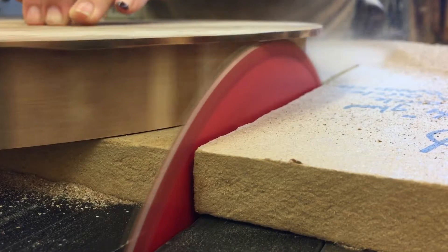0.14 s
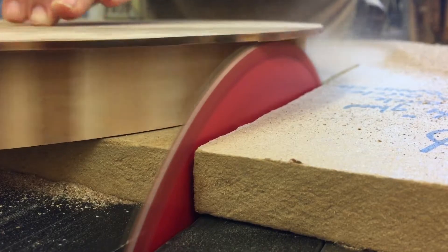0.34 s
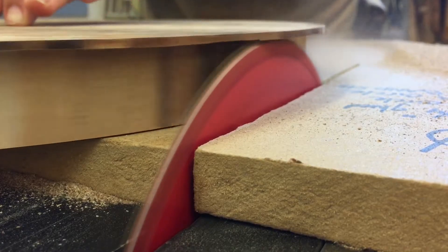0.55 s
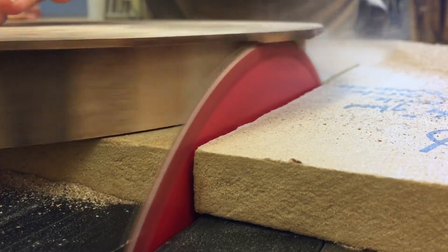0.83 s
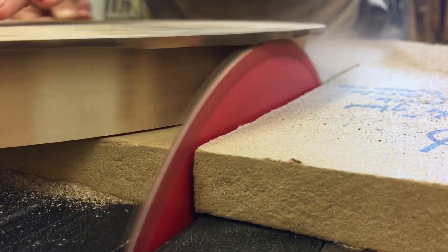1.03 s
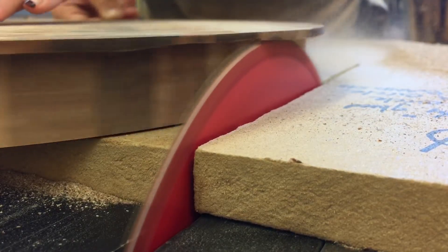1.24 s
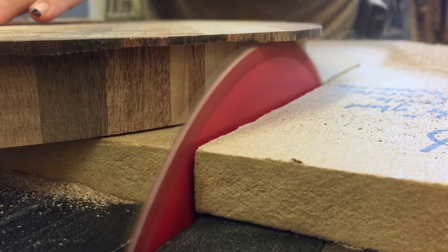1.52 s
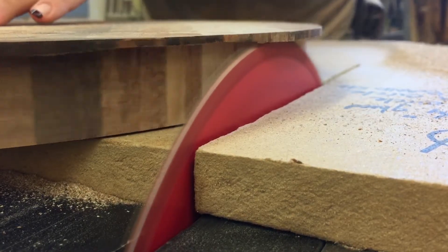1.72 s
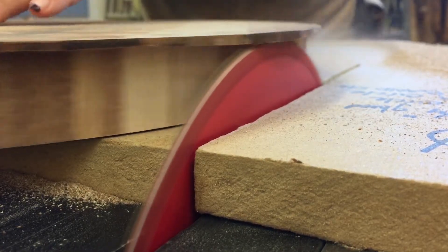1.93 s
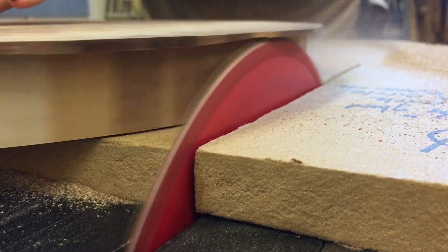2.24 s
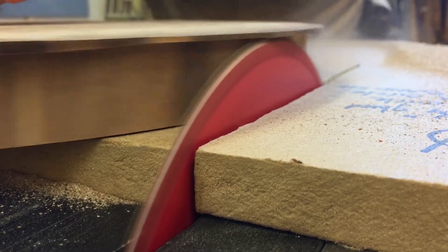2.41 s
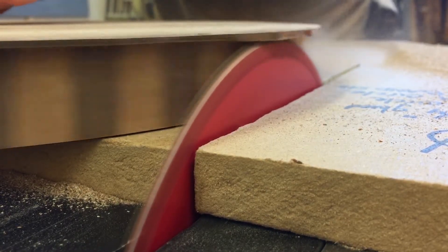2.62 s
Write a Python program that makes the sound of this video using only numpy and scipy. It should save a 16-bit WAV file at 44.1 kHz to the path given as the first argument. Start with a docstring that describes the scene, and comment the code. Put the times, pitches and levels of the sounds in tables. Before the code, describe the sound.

Close by, a table saw blade cuts continuously into a wooden edge, rasping and hissing over a low motor hum. A high whine and piercing squeals come and go, with a thin metallic shriek near the end.

```python
"""A table saw's teeth strike a turning round of glued wooden strips, trimming its edge, heard close by.
The periodic impacts make a whine whose harmonics swell into squeals; the unevenness of the teeth
repeats every turn as a buzz under the rasp and hiss of the chips. Resonances slide downwards as the
wood moves past the blade, the steel plate rings in its modes, and the motor hums below."""
import sys
import numpy as np
from scipy import signal
from scipy.fft import rfft, irfft
from scipy.io import wavfile

SR = 44100
rng = np.random.default_rng(int(sys.argv[2]) if len(sys.argv) > 2 else 0)


def transcribe(signal):
    """Save signal, clipped to [-1, 1], as a 16-bit WAV file at the path in sys.argv[1]."""
    frames = np.atleast_2d(signal).T
    limited = np.clip(frames, -1, 1)
    pcm = np.round(limited * 32767).astype(np.int16)
    wavfile.write(sys.argv[1], SR, pcm)


N = 122157
TIME = np.arange(N) / SR
FREQS = np.maximum(np.fft.rfftfreq(N, 1 / SR), 1)
TURNS_PER_S, TEETH = 68.52, 30
BITE_AT = 0.66   # share of a turn at which the blade bites hardest
LOW_CUT_HZ, HIGH_CUT_HZ = 53, 15780


# Envelopes of the tooth rate, its octave (the squeal) and its twelfth: t/s, relative level/dB
WHINE = [(0.0, -31), (0.05, -32), (0.15, -50), (0.2, -26), (0.47, -16), (0.52, -28), (0.87, -24.5),
         (1.03, -13.5), (1.13, -24), (1.72, -50), (1.95, -17.5), (2.07, -19), (2.23, -42), (2.27, -35),
         (2.77, -52)]
SQUEAL = [(0.0, -28), (0.09, -24), (0.14, -17), (0.21, -31), (0.25, -21), (0.43, -38), (0.51, -40),
          (0.6, -21), (0.67, -18.5), (0.76, -33), (0.8, -27), (0.91, -36), (1.01, -23), (1.05, -40),
          (1.08, -36), (1.16, -33), (1.19, -13), (1.23, -8.5), (1.28, -14), (1.32, -30), (1.36, -28),
          (1.4, -45), (1.76, -41), (1.95, -21), (2.07, -41), (2.11, -33), (2.21, -12), (2.24, -15.5),
          (2.29, -36), (2.33, -41), (2.44, -31), (2.5, -51), (2.7, -26.5), (2.73, -11), (2.77, -16)]
TWELFTH = [(0.0, -36), (0.15, -26.5), (0.17, -43), (0.42, -28.5), (0.71, -43), (0.73, -30), (1.23, -34),
           (1.33, -50), (1.81, -47), (1.87, -38), (2.06, -49), (2.19, -25), (2.34, -41), (2.44, -20.5),
           (2.55, -29), (2.6, -18.5), (2.7, -39), (2.77, -30)]

def whine(turn):
    """Periodic impacts of the teeth excite a harmonic series on the tooth-passing frequency."""
    first = tooth_tone(turn, WHINE, order=1, gain_db=-5.5, flutter_db=-1.5, jitter_rad=0.23)
    octave = tooth_tone(turn, SQUEAL, order=2, gain_db=2.37, flutter_db=1.0, jitter_rad=0.18)
    twelfth = tooth_tone(turn, TWELFTH, order=3, gain_db=1.3, flutter_db=3.9, jitter_rad=0.5)
    return (first * runout(turn, depth_db=3.5, at=BITE_AT)
            + octave * runout(turn, depth_db=2.8, at=0.56)
            + twelfth * runout(turn, depth_db=0.5, at=0.41))


def tooth_tone(turn, envelope, order, gain_db, flutter_db, jitter_rad):
    """One harmonic of the tooth rate, broadened by random phase and amplitude modulation."""
    wave = np.sqrt(2) * np.sin(2 * np.pi * order * TEETH * turn + jitter_rad * drift(44))
    return from_db(in_time(envelope) + gain_db + flutter_db * drift(83)) * wave


def runout(turn, depth_db, at):
    """Amplitude modulation: a blade out of true bites harder once a turn; `at` is a share of a turn."""
    return rms_one(from_db(depth_db * np.cos(2 * np.pi * (turn - at))))


def tooth_force(turn, periodic):
    """Uneven teeth give a line spectrum (share `periodic` of the power); tearing fibres give noise."""
    size, count = 8192, int(HIGH_CUT_HZ / TURNS_PER_S)
    harmonics = from_db(1.8 * rng.standard_normal(count)) * np.exp(2j * np.pi * rng.random(count))
    one_turn = rms_one(irfft(np.r_[0, harmonics], size))
    buzz = np.interp(turn % 1, np.arange(size) / size, one_turn)
    return np.sqrt(periodic) * buzz + np.sqrt(1 - periodic) * rng.standard_normal(N)


# Envelope of the rasp: t/s, relative level/dB
RASP = [(0.0, -23), (0.14, -25), (0.15, -24.5), (0.44, -22), (0.64, -25), (1.06, -23.5), (1.31, -27.5),
        (1.44, -26), (2.07, -23.5), (2.29, -25.5), (2.55, -24.5), (2.77, -26)]
# Spectrum of the rasp: f/Hz, relative level/dB
RASP_SPECTRUM = [(880, -16), (1500, -20.5), (1760, -12), (2050, -6), (2370, -5.5), (2590, -10.5),
                 (2870, -8.5), (3940, -7), (4250, -12.5), (4800, -11), (5180, -22.5), (5600, -18.5),
                 (7280, -60), (12300, -120)]

def rasp(turn):
    """Forced vibration: the teeth scrape and growl, and the few that stand proud chop once a turn."""
    scrape = from_db(in_time(RASP) + 2.5) * coloured(tooth_force(turn, periodic=0.27), RASP_SPECTRUM)
    growl = from_db(in_time(RASP) - 5) * resonate(tooth_force(turn, periodic=0.45), hz=2086, width_hz=570)
    chop = tooth_tone(turn, RASP, order=1, gain_db=-7.5, flutter_db=2.5, jitter_rad=0.45)
    return (scrape * runout(turn, depth_db=1.14, at=0.82)
            + (growl + chop) * runout(turn, depth_db=9, at=BITE_AT))


# Envelopes of the chips' hiss and the dust's sizzle: t/s, relative level/dB
HISS = [(0.0, -26.5), (0.85, -29.5), (0.86, -27), (1.13, -28.5), (1.16, -24.5), (1.32, -34), (1.74, -34.5),
        (1.89, -28.5), (1.99, -32.5), (2.34, -30), (2.62, -26.5), (2.63, -30.5), (2.75, -29.5), (2.77, -27)]
DUST = [(0.0, -35), (0.49, -35.5), (0.68, -38), (1.03, -33), (1.38, -40.5), (1.74, -39), (1.94, -34.5),
        (2.05, -37), (2.42, -33), (2.66, -36), (2.77, -35.5)]
# Their spectra: f/Hz, relative level/dB
HISS_SPECTRUM = [(2940, -2), (5000, -6.5), (5380, -5), (5790, -13), (6010, -2.5), (6350, 0), (7080, -7),
                 (8900, -6.5), (11600, -42), (19600, -120)]
DUST_SPECTRUM = [(8500, -14), (9500, 1), (11400, 1), (13000, 0.2), (15700, 0)]

def chips(turn):
    """Broadband noise: chips hiss and fine dust sizzles under a common random amplitude modulation."""
    hiss = from_db(in_time(HISS) + 5.5) * coloured(tooth_force(turn, periodic=0.3), HISS_SPECTRUM)
    hiss *= runout(turn, depth_db=0.6, at=0.81)
    dust = from_db(in_time(DUST) + 5.5) * coloured(tooth_force(turn, periodic=0.06), DUST_SPECTRUM)
    dust *= runout(turn, depth_db=-1.0, at=0.38)
    return (hiss + dust) * from_db(1.45 * drift(120))


# Resonances of the cut: onset t/s, duration/s, start f/Hz, end f/Hz, width/Hz, level/dB
SLIDES = [(-.06, 0.22, 3930, 3430, 220, -18.5), (0.108, 0.19, 4160, 3700, 150, -16.5),
          (0.242, 0.3, 3450, 2310, 320, -24), (0.62, 0.089, 3950, 3670, 120, -17.5),
          (0.847, 0.29, 3440, 2940, 350, -27), (1.13, 0.13, 4900, 4300, 400, -27),
          (1.33, 0.2, 2940, 2880, 150, -29.5), (1.423, 0.57, 2600, 2600, 169, -28),
          (1.91, 0.24, 3420, 2870, 240, -28), (2.644, .07, 4700, 4500, 352, -23),
          (2.712, 0.068, 4194, 3920, 150, -13)]

def sliding_resonances(turn):
    """Time-varying resonance: driven by the teeth, each swells and fades, and most fall in pitch."""
    out, force = 0, tooth_force(turn, periodic=0.57)
    for start, length, from_hz, to_hz, width_hz, db in SLIDES:
        progress = np.clip((TIME - start) / length, 0, 1)
        swell = from_db(db) * np.sqrt(np.abs(np.sin(np.pi * progress)))
        out += swell * resonate(force, from_hz + (to_hz - from_hz) * progress, width_hz)
    return out * runout(turn, depth_db=3.5, at=0.84)


# Modes of the steel plate: f/Hz, width/Hz, level/dB at mean hiss, dB gained per dB of hiss
PLATE_MODES = [(5048, 120, -34, 1.0), (6380, 470, -32.5, 1.16), (8080, 190, -39.5, 0.99),
               (9100, 51, -37, 1.2), (12360, 160, -44, 0.85)]
# Brief shrieks of the plate: centre t/s, Gaussian spread/s, f/Hz, level/dB
SHRIEKS = [(.45, .06, 12370, -36), (0.52, 0.035, 14420, -27), (.95, .11, 12370, -39),
           (1.003, 0.076, 8230, -35), (1.042, .08, 14270, -31), (1.92, 0.03, 14420, -27),
           (1.97, .04, 12370, -35), (2.06, .04, 14420, -30), (2.365, .12, 10300, -32),
           (2.42, 0.18, 12370, -37), (2.51, 0.33, 14420, -40)]

def plate(turn):
    """Modal resonance: the steel rings more as it cuts harder, and single high modes briefly shriek."""
    force = tooth_force(turn, periodic=0.1)
    effort_db = in_time(HISS) - in_time(HISS).mean()
    rings = sum(from_db(db + slope * effort_db) * resonate(force, hz, width_hz)
                for hz, width_hz, db, slope in PLATE_MODES)
    shrieks = 0
    for centre, spread, hz, db in SHRIEKS:
        swell = from_db(db) * np.exp(-((TIME - centre) / spread) ** 2 / 2)
        shrieks += swell * resonate(force, hz, width_hz=110)
    return rings + shrieks * from_db(2 * drift(30))


# Screams of the plate: onset t/s, duration/s, level/dB
SCREAMS = [(2.417, .125, -28.5), (2.547, .078, -19.5)]

def screams(hz=8254, edge_s=0.01):
    """Self-excited oscillation: one plate mode feeds on the friction, wavers and breaks off."""
    gate = sum(from_db(db) * np.clip(np.minimum(TIME - start, start + length - TIME) / edge_s, 0, 1)
               for start, length, db in SCREAMS)
    level = gate * from_db(2.6 * drift(50))
    return level * np.sqrt(2) * np.sin(2 * np.pi * hz * TIME + 0.8 * drift(40))


# Steady tones of motor and blade: f/Hz, rms level/dB
HUM = [(118.4, -31.5), (244, -42), (506, -36.5), (732.1, -42.5), (759, -41.5), (823.6, -46), (888.2, -48.5),
       (979.8, -36.5), (1028, -42), (1050, -41.5), (1233.4, -36), (1850, -36), (5001, -53.5), (5071, -43),
       (7397, -49)]
# Envelope of the air's roar under load: t/s, relative level/dB
LOAD = [(0.05, -23.5), (0.6, -26), (0.95, -24.5), (0.99, -26), (1.2, -23), (1.24, -29), (2.6, -25)]
# Spectrum of that roar: f/Hz, relative level/dB
AIR_SPECTRUM = [(18, -51), (30, -2.5), (118, -1.5), (149, -4.5), (252, -2), (418, -8.5), (504, -7.5),
                (694, -9.5), (1010, -10), (1110, -11), (1210, -9.5), (1700, -14), (2210, -65), (3740, -120)]

def motor(turn):
    """Tonal and aerodynamic noise: hum, a roar of air, and a rumble as the blade's draught buffets."""
    hum = 0
    for hz, db in HUM:
        level = from_db(db + 2.3 * drift(1.8))
        hum += level * np.sqrt(2) * np.sin(2 * np.pi * (hz * TIME + rng.random()) + 0.31 * drift(4.9))
    roar = from_db(in_time(LOAD) + 1) * coloured(tooth_force(turn, periodic=0.092), AIR_SPECTRUM)
    rumble = from_db(-36.5 + 4 * drift(16)) * resonate(rng.standard_normal(N), hz=117, width_hz=123)
    return hum + roar + rumble


def from_db(db):
    """Amplitude ratio of a level in decibels."""
    return 10 ** (np.asarray(db) / 20)


def rms_one(x):
    """Normalisation to unit rms."""
    return x / np.sqrt(np.mean(x ** 2) + 1e-20)


def in_time(envelope):
    """Linear interpolation of an envelope at every sample."""
    return np.interp(TIME, *np.transpose(envelope))


def drift(corner_hz):
    """Random fluctuation: low-pass noise of unit rms."""
    step, settle = 40, 2000   # samples per noise value; values dropped while the filter settles
    pole = np.exp(-2 * np.pi * corner_hz * step / SR)
    noise = rng.standard_normal(N // step + settle + 2)
    slow = signal.lfilter([1], [1, -2 * pole, pole * pole], noise)[settle:]
    return np.interp(np.arange(N) / step, np.arange(len(slow)), rms_one(slow))


def coloured(x, spectrum):
    """Spectral shaping by a curve interpolated in log frequency; unit rms."""
    hz, db = np.transpose(spectrum)
    gain = from_db(np.interp(np.log(FREQS), np.log(hz), db, -120, -120))
    return rms_one(irfft(rfft(x) * gain, N))


def resonate(x, hz, width_hz):
    """Double-pole resonance by heterodyning, so that its centre may move; unit rms."""
    carrier = np.exp(2j * np.pi * np.cumsum(hz + np.zeros(N)) / SR)
    pole = np.exp(-np.pi * width_hz / SR)
    baseband = signal.lfilter([1], [1, -2 * pole, pole * pole], x / carrier)
    return rms_one((baseband * carrier).real)


def scene():
    """Superposition of the sources; the blade's angle, counted in turns, keeps their throb in step."""
    speed = TURNS_PER_S * (1 + 0.000491 * drift(1.766))
    turn = np.cumsum(speed) / SR
    cut = whine(turn) + rasp(turn) + chips(turn) + sliding_resonances(turn)
    return (cut + plate(turn) + screams() + motor(turn))[None]


def record(dry):
    """Soft saturation rounds the highest peaks; band limiting cuts the deepest bass and the top."""
    rounded = dry / (1 + dry ** 8) ** (1 / 8)
    high_pass = 1 / np.sqrt(1 + (LOW_CUT_HZ / FREQS) ** 12)
    low_pass = 1 / np.sqrt(1 + (FREQS / HIGH_CUT_HZ) ** 1200)
    return irfft(rfft(rounded) * high_pass * low_pass, N)


dry = scene()
out = record(dry)
transcribe(out)
```